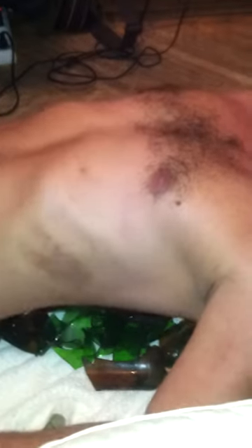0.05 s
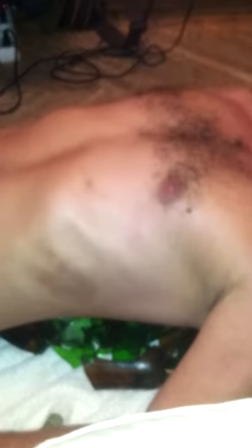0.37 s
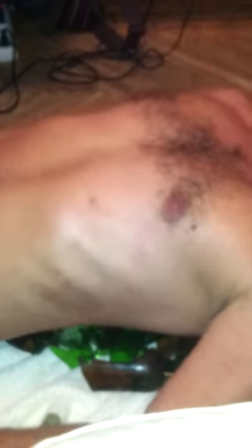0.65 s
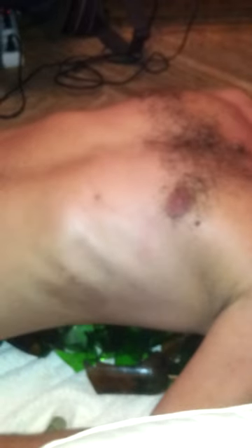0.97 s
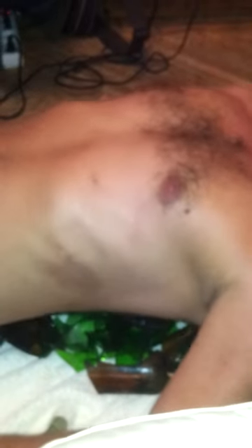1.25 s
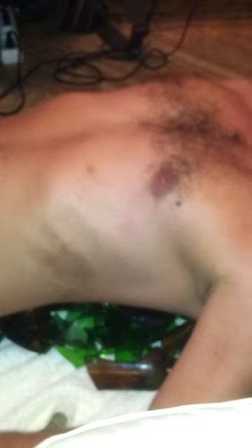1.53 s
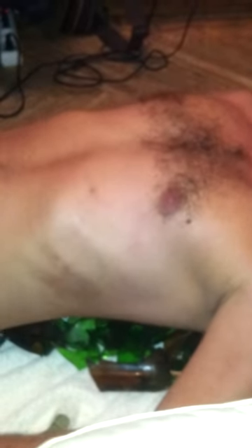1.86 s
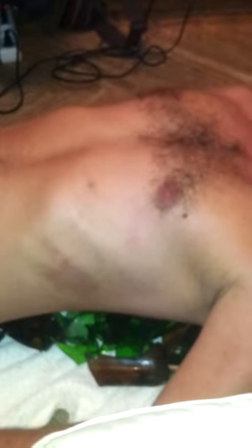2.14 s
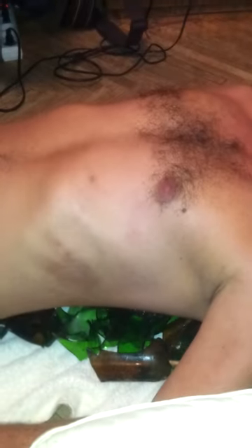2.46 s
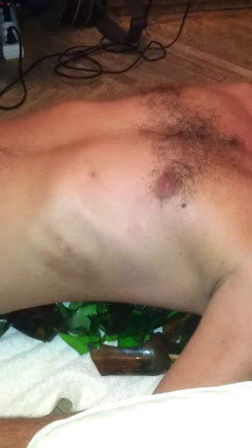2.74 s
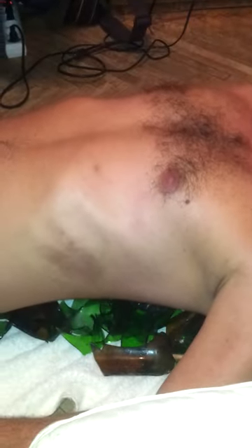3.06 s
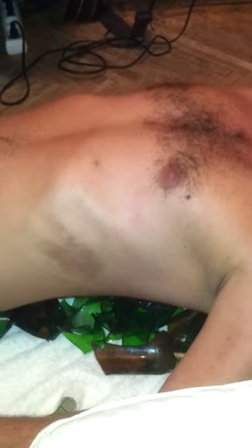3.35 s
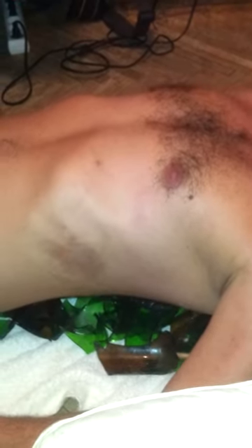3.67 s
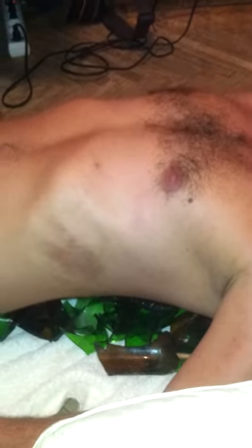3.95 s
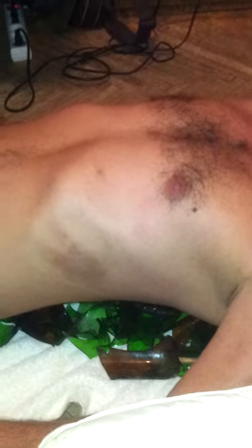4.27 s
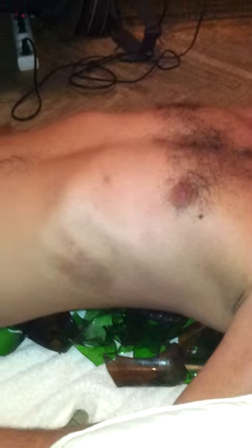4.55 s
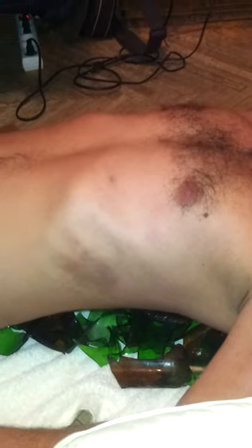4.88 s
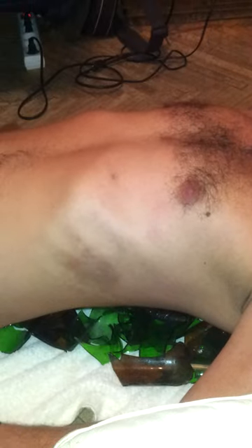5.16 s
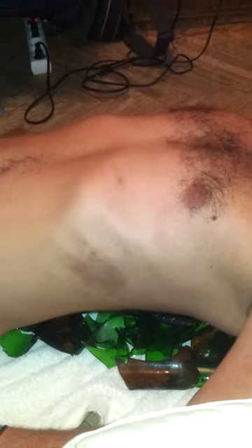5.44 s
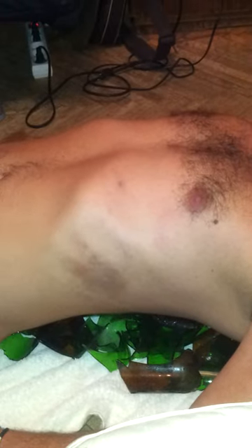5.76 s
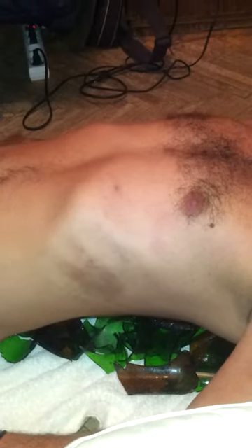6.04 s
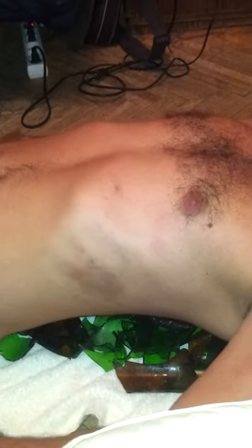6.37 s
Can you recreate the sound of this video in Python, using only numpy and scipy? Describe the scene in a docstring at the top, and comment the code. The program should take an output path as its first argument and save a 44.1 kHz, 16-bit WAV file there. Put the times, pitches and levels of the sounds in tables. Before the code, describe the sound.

Broken bottle glass on a towel crackles under a person lying on it in a small room. Shard edges grind in short swells while single pieces snap sharply at irregular moments, and a few chink briefly. Bigger breaks knock dully on the wooden floor, the loudest about two thirds through and another near the end. The stereo microphone is close and overloads on the hardest crack.

```python
"""Lying on broken glass

Broken bottle glass on a towel crackles as a person lying on it shifts his weight, in a small room.
Shard edges grind in swells of tiny slips, single shards snap, and bigger breaks knock on the wooden
floor. A few loose pieces ring briefly. A close stereo microphone overloads on the hardest break."""
import sys
import numpy as np
from scipy import signal
from scipy.fft import rfft, irfft
from scipy.io import wavfile
from scipy.ndimage import uniform_filter1d

SR = 44100
rng = np.random.default_rng(int(sys.argv[2]) if len(sys.argv) > 2 else 0)


def unload_wav(signal):
    """Save mono or channel-first audio to the path in sys.argv[1] as 16-bit WAV at rate SR, clipped to [-1, 1]."""
    wavfile.write(
        sys.argv[1],
        SR,
        np.round(np.clip(np.atleast_2d(signal).T, -1, 1) * 32767).astype(np.int16),
    )


N = 282673


def gain_of(db):
    """Turns decibels into a number to multiply a sound by."""
    return 10 ** (np.asarray(db) / 20)


def fade(t, fade_s):
    """Dies away by 60 dB every fade_s seconds."""
    return gain_of(-60 * t / fade_s)


def unit(x):
    """Scales a sound to an average energy of one per channel."""
    return x / np.sqrt(np.mean(np.sum(x ** 2, axis=-1)) + 1e-20)


def read(points, hz):
    """Looks up a pitch in a table, sliding smoothly between its rows."""
    pitches, values = np.transpose(points)
    return np.interp(np.log(hz + 1), np.log(pitches + 1), values)


def add(mix, start_s, sound):
    """Adds a sound to the stereo mix."""
    part = mix[:, max(round(start_s * SR), 0):][:, :sound.shape[-1]]
    part += sound[..., :part.shape[-1]]


def convolve(x, response):
    """Makes every sample of x set off a copy of the response."""
    return signal.fftconvolve(np.atleast_2d(x), np.atleast_2d(response), axes=1)[:, :N]


def colour(x, tone, size=2048):
    """Makes some pitches stronger and others weaker, following a tone table."""
    log_gain = np.log(gain_of(read(tone, abs(np.fft.fftfreq(size, 1 / SR)))))
    phase = -signal.hilbert(log_gain).imag  # so nothing rings before it is hit
    response = np.fft.ifft(np.exp(log_gain + 1j * phase)).real[:size // 2]
    return convolve(x, unit(response))


def stereo_noise(size):
    """Noise that is half shared by left and right, half their own."""
    return rng.standard_normal(size) + rng.standard_normal((2, size))


# The tone of the quiet room: pitch_hz, level_db
BACKGROUND_TONE = [(20, 3), (45, -1), (80, 0), (120, 3.5), (250, 2), (450, -1.5), (700, -26), (920, -10.5),
                   (1300, -8.5), (2500, -9.5), (7000, -14.5), (15000, -20.5)]
def background(level_db=-56):
    """The room rumbles steadily under a faint hiss."""
    return gain_of(level_db) * colour(stereo_noise(N), BACKGROUND_TONE)


# Each shift of weight onto the heap: peak_s, length_s, level_db
WEIGHT_SHIFTS = [(-0.008, 0.23, -38), (0.347, 0.24, -37.5), (0.436, 0.17, -31), (0.666, 0.44, -33.5),
                 (0.779, 0.43, -30), (1.026, 0.59, -39.5), (1.205, 0.45, -42.5), (1.408, 0.99, -42),
                 (1.88, 0.87, -39), (2.112, 0.42, -36.5), (2.3, 0.21, -34.5), (2.639, 0.37, -27),
                 (2.924, 0.31, -33), (3.172, 0.19, -33.5), (3.38, 0.46, -39), (3.8, 1, -48),
                 (4.436, 0.63, -39.5), (4.657, 0.12, -35.5), (4.868, 0.43, -38), (5.36, 0.3, -33),
                 (5.68, 0.28, -35), (5.815, 1, -43), (6.245, 1, -42)]
REST_DB = -58.5  # grinding under the resting weight
def load_db(t, build_share=0.42, swell_db=25.5):
    """How hard the heap grinds: the resting weight plus shifts that build and ease."""
    power = gain_of(REST_DB) ** 2
    for peak_s, length_s, db in WEIGHT_SHIFTS:
        from_peak = np.maximum((peak_s - t) / build_share, (t - peak_s) / (1 - build_share)) / length_s
        power = power + gain_of(db - swell_db * from_peak) ** 2
    return 10 * np.log10(power)


def slip_sizes(spread_db):
    """Random strengths for slips: most are tiny, a few are larger."""
    return gain_of(spread_db * np.minimum(rng.exponential(1, N), 4))


def shard(fade_s, tick, width, count=40, size=900):
    """An odd-shaped piece of glass rings at many high pitches, with an optional tick."""
    t = np.arange(size) / SR
    place, life, strength, skew = rng.random((4, count, 1))
    hz = 3000 + 12500 * (np.arange(count)[:, None] + place) / count
    levels = (.5 + strength) * fade(t, fade_s * (.5 + life))
    left = 2 * np.pi * (hz * t + rng.random((count, 1)))
    right = left + width * (2 * skew - 1)  # each pitch spreads in its own directions
    ring = np.array([(levels * np.cos(phase)).sum(0) for phase in (left, right)])
    return unit(unit(ring) + tick * (t == 0))


# The tone of glass rubbing on glass: pitch_hz, level_db
GRIND_TONE = [(40, -27), (120, -6), (220, -0.5), (400, -10.5), (680, -6.5), (1200, -14), (2300, -6.5),
              (3300, -9.5), (4500, -4), (6000, -1.5), (8000, -2.5), (10500, -7), (16000, -13.5)]
def grinding(slips_per_s=750, pieces=40):
    """Edges catch and slip, and each slip rings one piece in the heap."""
    slips = slip_sizes(spread_db=3.5) * rng.choice([-1, 1], N)
    slips *= rng.random(N) < slips_per_s / SR
    slips /= np.sqrt(abs(uniform_filter1d(slips ** 2, size=1500)) + 1e-6)  # even out the loudness
    slips *= gain_of(load_db(np.arange(N) / SR))
    piece = rng.integers(0, pieces, N)
    heap = sum(convolve(slips * (piece == k), shard(fade_s=.038, tick=.48, width=2.6))
               for k in range(pieces))
    return colour(heap, GRIND_TONE)


# How strongly the heap drags as the body settles: time_s, level_db
DRAG_LEVELS = [(0, -57.5), (.45, -51), (.9, -58), (1.27, -49), (2, -59.5), (3.4, -58), (4.3, -55.5),
               (5.05, -61), (6.41, -51.5)]
# The muffled tone of that dragging: pitch_hz, level_db
DRAG_TONE = [(80, -19), (200, -15.5), (380, -8), (650, -5.5), (900, -4), (1200, -16.5), (3000, -21.5)]
def dragging(trim_db=-3, slips_per_s=700):
    """Pieces at the bottom of the heap slip dully on the towel and floor."""
    sizes = slip_sizes(spread_db=4) * (rng.random(N) < slips_per_s / SR)
    slips = colour(sizes * stereo_noise(N), DRAG_TONE)
    level_db = np.interp(np.arange(N) / SR, *np.transpose(DRAG_LEVELS))
    return slips / slips.std() * gain_of(level_db + trim_db)


# Heavy pieces pushed against the floor, before the boosts: start_s, boom_db, knock_db, pitch_hz
FLOOR_HITS = [(.003, -33, -42, 550), (0.789, -62, -33, 885), (1.067, -44, -32, 870),
              (1.767, -36.5, -33, 670), (1.919, -26, -27.5, 720), (2.02, -30.5, -29, 644),
              (2.354, -59, -33.5, 875), (2.628, -25.5, -40, 900), (4.393, -15, -21, 870),
              (5.776, -31.5, -39, 635), (6.182, -10.5, -19.5, 580)]
# The low notes of the floor and the room above it: pitch_hz, level_db, fade_s
FLOOR_NOTES = [(55, -19, .09), (100, -13, .12), (125, -15, .18), (150, -16, .2), (185, -4, .09),
               (209, 0, .19), (237, -2, .15), (281, -5, .18), (345, -9, .18), (480, -18, .18)]
# The tone of a knock: pitch_hz, level_db
KNOCK_TONE = [(60, -21), (300, 1.5), (700, 1), (1100, -10.5), (1380, 1), (1800, -16), (3000, -2.5),
              (8000, -39.5)]
def knocks(boom_boost_db=19, knock_boost_db=21):
    """Glass gives way and hits the floor through the towel: a dull knock, and the boards boom."""
    booms, raps = np.zeros((2, N)), np.zeros((2, N))
    t = np.arange(SR // 3) / SR
    rise = 1 - np.exp(-t / .002)
    for start_s, boom_db, knock_db, pitch_hz in FLOOR_HITS + floor_nudges():
        boom = sum(gain_of(db) * fade(t, fade_s) * np.cos(2 * np.pi * hz * rng.uniform(.975, 1.025) * t)
                   for hz, db, fade_s in FLOOR_NOTES)
        rattle = stereo_noise(len(t)) * fade(t, .1)
        rattle = unit(colour(rattle, KNOCK_TONE))[:, :len(t)]
        hollow = unit(np.sin(2 * np.pi * pitch_hz * t) * fade(t, .03))
        add(booms, start_s, gain_of(boom_db + boom_boost_db) * unit(boom * rise))
        add(raps, start_s, gain_of(knock_db + knock_boost_db) * unit(rattle + gain_of(-4) * hollow))
    return booms + gain_of(-12.5) * room(booms) + raps + gain_of(-3) * room(raps)


# Loose pieces that ring on: start_s, pitch_hz, level_db, fade_s
LOOSE_PIECES = [(.04, 7400, -46, .2), (.468, 6950, -36, .22), (2.143, 6900, -35, .13),
                (2.258, 7550, -41, .2), (4.149, 4520, -43, .14), (5.058, 9400, -41, .11),
                (5.382, 4450, -26, .08), (5.43, 7050, -35, .17), (5.993, 6100, -43, .1),
                (6.048, 6850, -46, .2)]
def chinks():
    """A free piece rings at one clear pitch."""
    out, t = np.zeros((2, N)), np.arange(SR // 3) / SR
    for start_s, hz, db, fade_s in LOOSE_PIECES:
        add(out, start_s, gain_of(db) * fade(t, fade_s) * np.sin(2 * np.pi * hz * t))
    return out


# Shards that snap clearly, before the boost: start_s, level_db, pitch_hz, brightness_db, depth
# (depth is 0 on top of the heap and 1 at the bottom)
CLEAR_SNAPS = [(0.337, -20, 4300, -18, 0.95), (0.435, -17, 5170, -21, .9), (0.748, -12.5, 3980, -3, 0.64),
               (0.7904, -13.5, 9100, -5, 0.91), (0.996, -27.5, 7140, 3, 0.95), (1.067, -13, 4350, -5, 0.66),
               (1.433, -15, 5430, -6, .3), (1.458, -12, 6560, 1, 0.6), (1.608, -25, 6100, -5, 0.9),
               (1.637, -18, 5700, -8, 0.62), (1.731, -21, 5100, -17, 0.24), (1.766, -21.5, 6100, -9, 0.57),
               (1.833, -19.5, 5330, 1, 0.55), (1.918, -15, 5780, -3, 0.33), (1.947, -19.5, 5450, -21, 0.45),
               (2.008, -14.5, 5600, -13, 0.79), (2.021, -13, 5630, 14, 0.4), (2.118, -13, 6800, -7, 0.59),
               (2.14, -13, 5920, 0, 0.57), (2.162, -12.5, 6600, -2, 0.54), (2.251, -18.5, 6170, -1, .65),
               (2.278, -18.5, 7400, -1, 0.63), (2.3334, -19, 8250, -15, 0.9), (2.353, -18, 5440, 0, .8),
               (2.479, -23.5, 6100, -17, .05), (2.506, -24, 7360, -3, .05), (2.609, -13.5, 4370, -15, 0.95),
               (2.628, -19, 6200, -18, .35), (2.654, -7, 8200, -13, 0.66), (2.682, -13, 4400, -10, 0.34),
               (2.742, -22, 7160, -16, 0.8), (2.845, -20.5, 8600, -8, 0.24),
               (2.875, -18.5, 5730, -10, 0.73), (2.909, -10, 6300, -23, 0.2),
               (2.947, -11.5, 7860, -12, 0.54), (3.095, -19, 9100, -1, 0.05),
               (3.13, -11.5, 5520, -6.5, 0.61), (3.215, -16.5, 5350, -8, 0.5), (3.293, -17.5, 8700, 1, .35),
               (3.323, -19.5, 5870, -5, 0.67), (3.362, -13.5, 4500, -6, 0.53), (3.439, -17, 6040, -9, 0.7),
               (3.473, -11, 5350, 1, 0.18), (3.503, -11, 5350, 0, 0.83), (3.513, -6.5, 8000, -4, 0),
               (3.706, -17.5, 4780, -8, 0.42), (3.735, -18.5, 8900, -6, 0.17), (3.76, -15, 8270, 2, 0.46),
               (3.811, -20, 8400, -3, 0), (3.833, -24, 7280, -3, 0.78), (3.937, -24.5, 7440, -11, .2),
               (4.247, -23, 7600, -5, 0.3), (4.3143, -24, 4600, -32, 0.67), (4.393, 4.5, 7490, -4, 0.41),
               (4.666, -19, 7400, -20, 0.33), (4.713, -18.5, 8000, -1, 0.3), (4.765, -19, 7400, -10, .4),
               (4.831, -18.5, 8260, -16, 0.97), (4.859, -3.5, 6060, -4, 0.38), (4.955, -15, 7180, -30, 0.1),
               (5.048, -23, 5300, -16, 0.84), (5.057, -5.5, 7200, 1.5, 0.15), (5.14, -25.5, 5950, -8, 0.37),
               (5.256, -20, 6300, -19, .5), (5.309, -11, 5750, 0, 0.47), (5.321, -9, 8840, -2, 0.5),
               (5.332, -8.5, 5070, -10, 0), (5.381, -2.5, 6500, -5, 0.43), (5.445, -13.5, 7000, -6, 0.45),
               (5.534, -11, 5330, -5, 0.63), (5.619, -22, 5600, -14, 0.45), (5.643, -22, 6100, -8, 0.95),
               (5.776, -14.5, 7900, -10.5, 0.71), (5.848, -21, 6930, -10, 0.72),
               (5.913, -20, 7360, -23, 0.48), (5.952, -22.5, 5930, -9, 0.35), (5.993, -17, 6120, -12, 0.1),
               (6.049, -22.5, 6650, -20, 0.05), (6.181, -1, 6840, -5.5, 0.54),
               (6.367, -23.5, 6500, -8, 0.48)]
# The tone of breaking glass: pitch_hz, level_db
SNAP_TONE = [(40, -12), (200, -23.5), (700, -9), (1200, -11), (2300, -8.5), (3300, -11), (4500, -1),
             (6000, 2), (8000, -0.5), (10500, -10), (16000, -18)]
def snaps(boost_db=13, jerks_per_s=12000, crumbs_per_s=600, rise_s=.001, run_s=.0036, size=4000, spots=4):
    """A crack runs through a shard in quick jerks, makes it ring and sheds crumbs."""
    direct, to_room = np.zeros((2, N)), np.zeros((spots, 2, N))
    t = np.arange(size) / SR
    highpass = signal.butter(2, 9800, "high", fs=SR)
    rise = 1 - np.exp(-(t / rise_s) ** 4)
    click = np.arange(size) == round(rise_s * SR)
    for k, (start_s, db, hz, brightness_db, depth) in enumerate(CLEAR_SNAPS + small_snaps()):
        # a buried shard crumbles more, and more of it is heard by way of the room
        room_db, crumble_db = -8 + 17.5 * depth, -13.5 + 11 * depth
        push, chance = rise * stereo_noise(size), rng.random(size)
        jerks = unit(push * (chance < jerks_per_s / SR) / (1 + (t / run_s) ** 4))
        crumbs = unit(push * (1 - chance < crumbs_per_s / SR) * fade(t, .08))
        main_note = unit(rise * np.cos(2 * np.pi * hz * t) * fade(t, .007))
        ring = unit(rise * shard(fade_s=.016, tick=0, width=2.2, count=26, size=size))
        snap = unit(jerks + gain_of(-2) * ring + gain_of(-9) * main_note) + gain_of(crumble_db) * crumbs
        # the room hears the shard from all sides, which partly evens out its tone
        all_round = .85 * snap + .5 * click
        both = np.concatenate([snap, all_round])
        treble = signal.filtfilt(*highpass, both, padtype=None)
        both += (gain_of(.75 * (brightness_db + 16)) - 1) * treble  # a cleaner break is brighter
        near, far = np.split(colour(both, SNAP_TONE), 2)
        add(direct, start_s, gain_of(db + boost_db) * unit(near))
        add(to_room[k % spots], start_s, gain_of(db + boost_db + room_db) * unit(far))
    return direct + sum(room(spot) for spot in to_room)


def small_snaps(count=48, resting_db=-35.5, load_share=.58, spread_db=5, brightness_db=-14):
    """Lesser shards snap at random, harder under more weight. Gives rows like CLEAR_SNAPS."""
    when, size, pitch, depth = rng.random((count, 4)).T
    start_s = (np.arange(count) + when) / count * N / SR
    level_db = resting_db + load_share * (load_db(start_s) - REST_DB) + spread_db * (2 * size - 1)
    pitch_hz = np.interp(pitch, [0, 1], [4800, 7950])
    return list(zip(start_s, level_db, pitch_hz, np.full(count, brightness_db), depth / 2))


def floor_nudges(boom_offset_db=-27, knock_offset_db=-32, pitch_hz=630):
    """Each clear snap kicks back against the floor. Gives rows like FLOOR_HITS."""
    return [(s, db + boom_offset_db, db + knock_offset_db, pitch_hz) for s, db, *_ in CLEAR_SNAPS]


# How long the room's echo lasts: pitch_hz, fade_s
ECHO_FADES = [(150, 0.44), (400, 0.27), (1000, 0.41), (3000, 0.33), (7000, 0.23), (14000, 0.21)]
def room(x, echoes_per_s=7000, build_s=.0017, mono_hz=450):
    """Sound bounces around the small room, and each pitch dies away at its own speed."""
    echoes = rng.standard_normal((2, SR // 2)) * (rng.random((2, SR // 2)) < echoes_per_s / SR)
    hz, t, (left, right) = signal.stft(echoes, SR, nperseg=256)
    shared = 1 / (1 + (hz[:, None] / mono_hz) ** 4)  # the bass is alike on both sides
    bands = np.array([left, shared * left + np.sqrt(1 - shared ** 2) * right])
    tail = signal.istft(bands * fade(t, read(ECHO_FADES, hz)[:, None]), SR, nperseg=256)[1]
    rise = 1 - np.exp(-(np.arange(tail.shape[1]) / SR / build_s) ** 2)
    return convolve(x, unit(tail * rise))


def scene():
    """All the sounds of the glass and the floor, together in the room."""
    rustle = grinding() + dragging() + chinks()
    return snaps() + rustle + .7 * room(rustle) + knocks() + background()


def record(dry, right_delay_s=2.6e-5, top_hz=14680):
    """The microphone's left side is a little nearer and favours bass; its right side favours treble."""
    hz = np.fft.rfftfreq(N, 1 / SR)
    balance_db = read([(200, 3.3), (690, 3), (1300, -.3), (4300, -1.3), (8000, -3.7), (14000, -3.7)], hz)
    left = gain_of(balance_db / 2)
    right = gain_of(-balance_db / 2) * np.exp(-2j * np.pi * hz * right_delay_s)
    heard = irfft(rfft(dry) * np.array([left, right]), N)
    heard = heard / (1 + heard ** 6) ** (1 / 6)  # overload squashes the tallest peaks
    lowpass = signal.firwin(301, top_hz, window=("kaiser", 7), fs=SR)
    return signal.oaconvolve(heard, lowpass[None], "same")


dry = scene()
out = record(dry)
unload_wav(out)
```